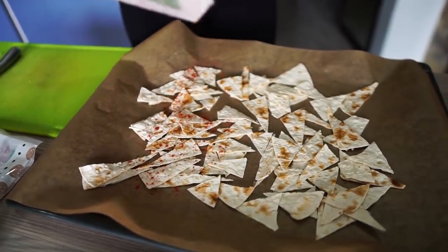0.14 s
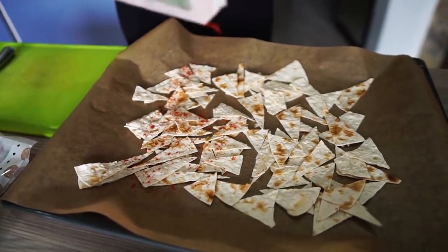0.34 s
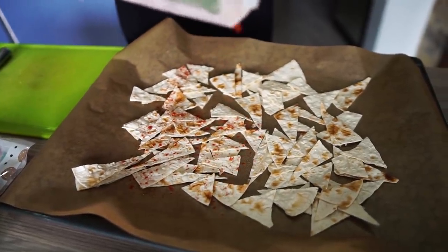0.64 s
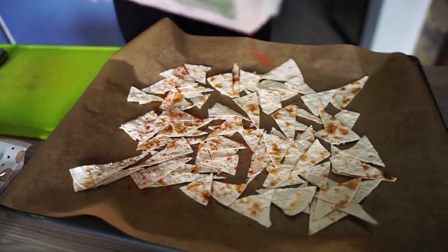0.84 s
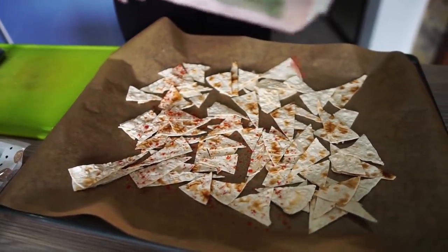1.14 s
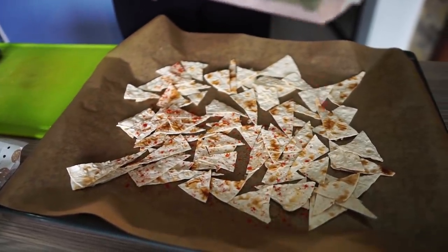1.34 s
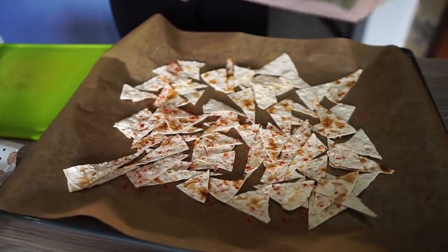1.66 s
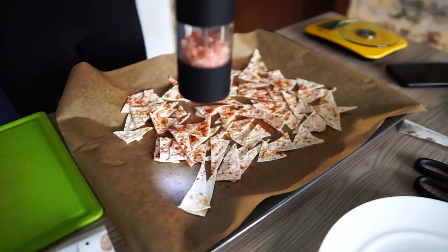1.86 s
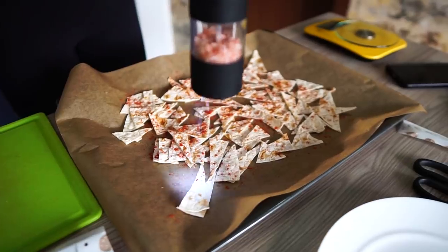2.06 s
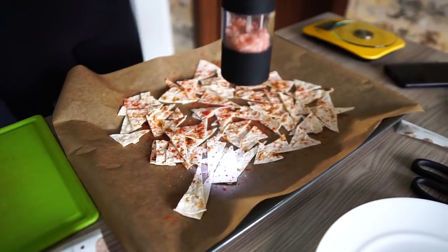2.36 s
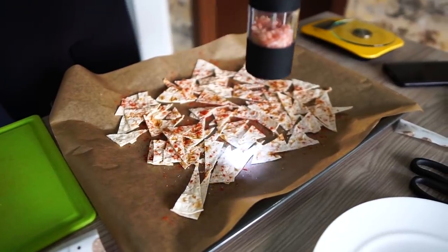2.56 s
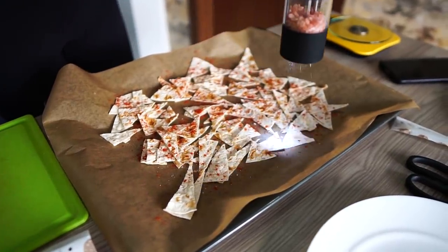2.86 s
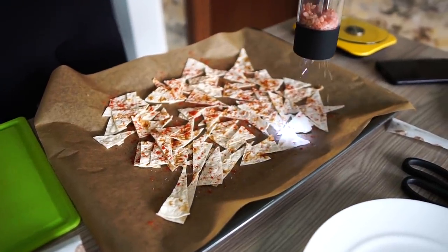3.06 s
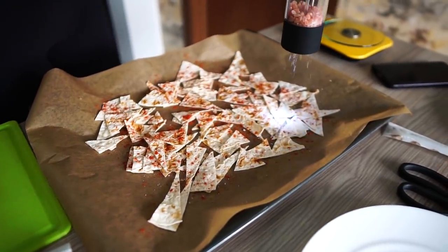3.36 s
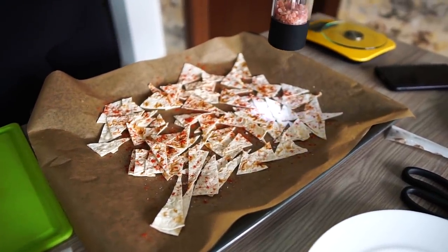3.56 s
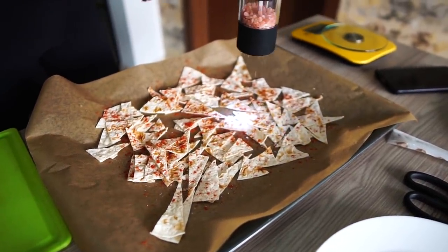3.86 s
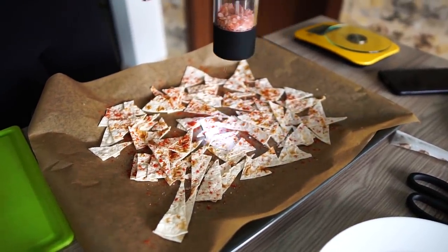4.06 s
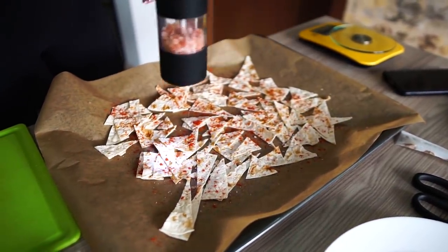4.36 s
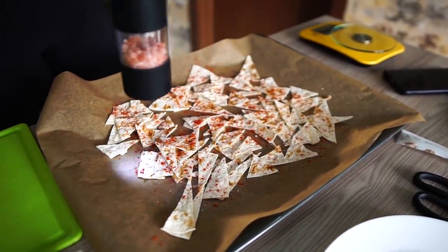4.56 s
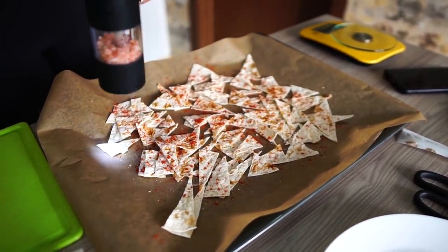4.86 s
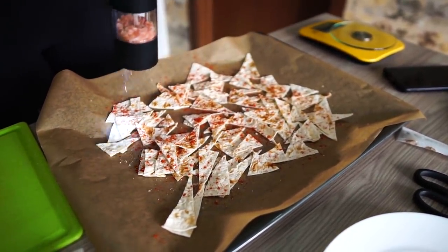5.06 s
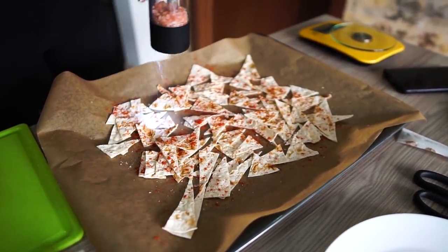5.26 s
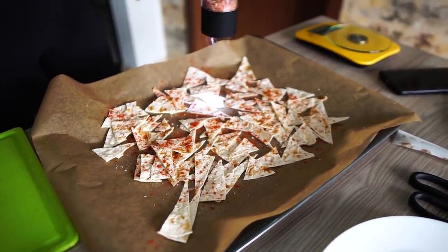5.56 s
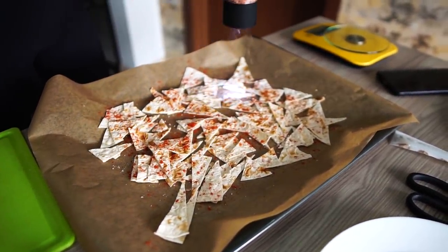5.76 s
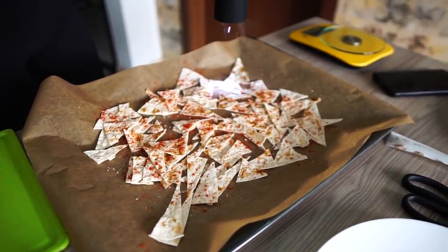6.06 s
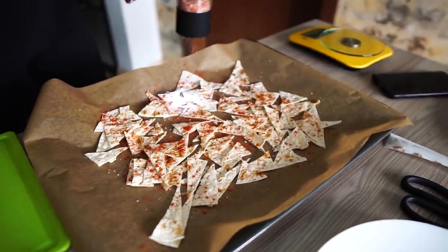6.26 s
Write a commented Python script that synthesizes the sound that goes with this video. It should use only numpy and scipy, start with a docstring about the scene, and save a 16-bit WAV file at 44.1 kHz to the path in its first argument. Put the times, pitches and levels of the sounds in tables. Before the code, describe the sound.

In a small home kitchen with a faint low appliance hum, a packet hisses and crinkles while fine spice ticks sharply onto baking paper. After about two seconds an electric salt mill starts abruptly, much louder: a high gear whine that sags and recovers, gritty burr crunching and irregular crystal cracks. It runs to the end, drifting slightly between left and right. Close stereo microphone, short room reflections.

```python
"""A kitchen hums while a packet rustles and spice ticks onto baking paper; then a small electric mill grinds salt.
Hum and air are wavering tones and soft filtered noise; the packet is hiss, crinkling puffs and short noise ticks.
The mill's gears are partials that whine and sag in pitch under load; its burr crunches as many tiny fractures.
Large crystals crack as body knocks with bursts of noise, and moving echoes follow the hand that sweeps the mill."""
import sys
import numpy as np
from scipy import signal
from scipy.fft import rfft, irfft, next_fast_len
from scipy.io import wavfile
from scipy.ndimage import uniform_filter1d, map_coordinates

SR = 44100
rng = np.random.default_rng(int(sys.argv[2]) if len(sys.argv) > 2 else 0)


def inscribe(sig):
    """Save sig as 16-bit PCM at rate SR to the path in sys.argv[1].

    A 1-D sig is mono; a 2-D sig holds one channel per row.
    Samples are clipped to [-1, 1] before scaling.
    """
    pcm = np.round(np.clip(np.atleast_2d(sig).T, -1, 1) * 32767)
    wavfile.write(sys.argv[1], SR, pcm.astype(np.int16))


N = 282612
START_S = 1.872  # the packet stops and the mill starts
SIDES = np.array([[1], [-1]])  # left, right


def amp(db):
    """Turns decibels into a plain multiplier."""
    return 10 ** (np.asarray(db) / 20)


def fade(t, t60_s):
    """A dying sound: it loses 60 dB in t60_s seconds."""
    return amp(-60 * t / t60_s)


def pan(db):
    """Left and right gains that are db apart; above zero leans left."""
    return amp(db / 2 * SIDES)


def evened(x):
    """Scales a sound to an rms level of one."""
    return x / np.sqrt(np.mean(x ** 2) + 1e-20)


def read(points, hz):
    """Reads a colour table at any pitch, with pitch on a log scale."""
    f, value = np.transpose(points)
    return np.interp(np.log(hz + 1), np.log(f + 1), value)


def follow(rows):
    """Every column of a curve table, one value a sample."""
    s, *columns = np.transpose(rows)
    return [np.interp(np.arange(N) / SR, s, c) for c in columns]


def coloured(x, gain):
    """Filters the last axis by a gain that depends on frequency."""
    size = next_fast_len(N)
    spectrum = rfft(x, size) * gain(np.fft.rfftfreq(size, 1 / SR))
    return irfft(spectrum, size)[..., :N]


def band(x, lo_hz, hi_hz):
    """Keeps mostly the sound between two pitches."""
    return signal.lfilter(*signal.butter(N=2, Wn=[lo_hz, hi_hz], btype="band", fs=SR), x)


def drift(hz):
    """Complex noise, smoothed so that it wanders up to about hz times a second."""
    step = int(SR / 1400) if hz < 45 else 1  # slow noise is drawn coarsely and joined by lines
    at = np.arange(0, N + step, step)
    r = np.exp(-2 * np.pi * hz * step / SR)
    a, b = signal.lfilter([1], [1, -2 * r, r * r], rng.standard_normal((2, len(at))))
    z = np.interp(np.arange(N), at, a + 1j * b)
    return z / np.sqrt(np.mean(abs(z) ** 2))


# the wavering appliance tones before the mill starts: (f/Hz, wander/Hz, rms level/dB, steadiness [no unit])
HUM_TONES = [(61, 2.9, -44, 1.8), (99.6, 2.8, -44.5, 4.1), (116.6, 3.4, -55, 0.5), (146.5, 8.5, -48, 0.54),
             (196.5, 0.38, -42.5, 7.9), (473, 3.3, -50.5, 2.8), (517.5, 14.4, -49, 2.2)]


def hum():
    """Appliance tones: each is a cosine whose loudness and phase wander slowly."""
    t, tones = np.arange(N) / SR, 0
    for hz, wander_hz, db, steadiness in HUM_TONES:
        loudness = evened(steadiness + drift(wander_hz).real)
        phase = 2 * np.pi * hz * t + 1.1 * drift(wander_hz).real
        tones = tones + amp(db) * np.sqrt(2) * loudness * np.cos(phase)
    return tones


# colour of the wash of air, before it is scaled as a whole: (f/Hz, relative level/dB)
AIR_COLOUR = [(12, -55), (20, -23), (49, -22), (103, 0.5), (167, -5.5), (200, 2), (276, -6.5), (332, -2.5),
              (414, -10.5), (517, -9), (714, -12.5), (2310, -32), (2500, -44), (3250, -63), (5500, -120)]
AIR_DB = -40  # level of the part both microphones share


def air():
    """A low wash of filtered noise, nearly alike at both microphones, most of all in the bass."""
    middle, other = coloured(rng.standard_normal((2, N)), lambda hz: amp(read(AIR_COLOUR, hz)))
    side = coloured(other, lambda hz: np.clip(hz / 1200, .03, .6))
    return amp(AIR_DB) * (middle + SIDES * side) / middle.std()


# how much of the kitchen's sound is left once the mill runs: (f/Hz, level/dB)
KITCHEN_DROP = [(25, -18), (45, -29), (62, -17.5), (100, -5.5), (150, -7.5), (200, -10.5), (500, -4.5)]


def kitchen():
    """Hum and air together; once the mill starts they are weaker, most of all in the deep bass."""
    room = hum() + air()
    weaker = coloured(room, lambda hz: amp(read(KITCHEN_DROP, hz)))
    return np.where(np.arange(N) / SR < START_S, room, weaker)


# colour of the hiss, before it is evened: (f/Hz, relative level/dB)
HISS_COLOUR = [(530, -20), (900, -3), (1340, -4.5), (1600, -1.5), (1810, -4.5), (3680, -5.5), (6800, -8),
               (13800, -8), (16000, -8)]


def hiss(level_db):
    """Fine grains on paper: filtered noise, partly shared by both sides."""
    noise = rng.standard_normal((3, N))
    wide = noise[0] + 1.8 * noise[1:]
    return evened(coloured(wide, lambda hz: amp(read(HISS_COLOUR, hz)))) * amp(level_db)


def crinkle(level_db, crinkle_hz):
    """The packet crinkles: short puffs at chance moments, shifted up to the pitch where the foil crinkles."""
    grains = amp(4.0 * np.minimum(rng.exponential(1, N), 3))
    grains = grains * (rng.random(N) < 300 / SR)  # about 300 a second
    puffs = signal.oaconvolve(grains, fade(np.arange(800) / SR, 0.023))[:N]
    wide = drift(1900) + 0.56 * drift(1100) * SIDES
    carrier = np.exp(2j * np.pi * np.cumsum(crinkle_hz) / SR)
    crinkle_db = -8.5  # against the hiss
    return amp(level_db + crinkle_db) * evened(puffs * (wide * carrier).real)


# the clearest ticks: (t/s, snap level/dB, snap centre f/Hz, left-right level/dB, relative paper thud level/dB)
CLEAR_TICKS = [(0.0461, -23, 10100, 1, -34.5), (0.0585, -27, 11400, .5, -46), (0.3355, -10, 7820, 6, -24),
               (0.424, -28, 8650, -1.5, -46), (0.4682, -24, 14100, -1.5, -37),
               (0.4808, -22, 10200, -.5, -44), (0.5477, -29, 7690, 3, -49), (0.572, -30, 7550, -1, -49),
               (0.5985, -30, 14000, -1, -50), (0.6305, -28, 13600, -.5, -40), (0.6414, -29, 10100, -2, -47),
               (0.6594, -28, 10000, -1, -53), (0.7562, -24.5, 7700, 1, -43), (0.7893, -26, 5090, 1, -48),
               (0.852, -30, 7300, 0, -39), (0.896, -30, 4080, 0, -39), (0.9275, -16, 4830, 1, -30),
               (0.9566, -25.5, 4230, .5, -46), (1.0794, -28, 5230, -.5, -40), (1.0966, -24, 2980, -1, -45),
               (1.111, -22, 5000, 0, -48), (1.1982, -35, 15400, -4, -50), (1.222, -25, 11800, 2, -45),
               (1.2397, -21, 10700, 1, -35.5), (1.367, -26, 15400, -1, -41), (1.3982, -29, 11900, -.5, -50),
               (1.4601, -32, 14200, -5, -50), (1.6616, -32, 10800, -10, -51), (1.694, -27, 13300, -8, -48),
               (1.8365, -28, 9700, -4, -50)]
FAINT_DB, FAINT_SPREAD_DB, FAINT_THUD_DB = -33, 2.5, -48
FAINT_LOW_HZ, FAINT_HIGH_HZ = 5000, 12000
SIZZLE_DB, SIZZLE_DB_PER_KHZ = -6.5, 1.2  # against the tick's level at 11 kHz; brighter ticks sizzle more


def faint_ticks(count):
    """Rows like those of the clear ticks, at chance moments and pitches."""
    return [(a * START_S, FAINT_DB + FAINT_SPREAD_DB * (2 * b - 1),
             FAINT_LOW_HZ * (FAINT_HIGH_HZ / FAINT_LOW_HZ) ** c,
             6.0 * (d - .5), FAINT_THUD_DB) for a, b, c, d in rng.random((count, 4))]


def spice_ticks():
    """Single ticks: each is noise cut into a sharp snap, a high sizzle and a thud of the paper."""
    out, t = np.zeros((2, N)), np.arange(1500) / SR
    for s, db, hz, pan_db, thud_db in CLEAR_TICKS + faint_ticks(count=22):
        shared, apart = rng.standard_normal((2, 1500))
        z = shared + 0.59 * apart * SIDES
        snap = band(z * (fade(t, 0.0037) + amp(-18) * fade(t, 0.044)), 0.81 * hz, min(1.4 * hz, 17000))
        snap = snap / (3 * snap[:, :130].std())  # brings the peak near one
        sizzle = band(1.75 * z * fade(t, 0.013), 9500, 22000)
        sizzle_db = db + SIZZLE_DB + SIZZLE_DB_PER_KHZ * (hz / 1000 - 11)
        # the sheet rings on longer
        thud = band(3.5 * z * (fade(t, .007) + amp(-15) * fade(t, .09)), 1700, 3500)
        tick = amp(db) * snap + amp(thud_db) * thud + amp(sizzle_db) * sizzle
        at = round(s * SR)
        out[:, at:at + 1500] += pan(pan_db) * tick
    return out


# how the packet rustles: (t/s, hiss level/dB, centre of the crinkle f/Hz)
PACKET_RUSTLE = [(0, -45.5, 8800), (.17, -44, 7200), (.3, -45, 6980), (.36, -43, 4500), (.41, -42, 5500),
                 (.46, -42, 12500), (.55, -43.5, 8400), (.61, -44.5, 12170), (.83, -44, 8630),
                 (.99, -41.5, 5930), (1.03, -46, 6480), (1.1, -40.5, 5300), (1.24, -43, 10500),
                 (1.31, -43, 6800), (1.37, -41.5, 12000), (1.43, -44, 10470), (1.47, -41.5, 13500),
                 (1.55, -48.5, 7540), (1.69, -44, 12500), (1.78, -43.5, 6500), (1.85, -44.5, 11700)]


def packet():
    """Hiss and crinkle follow one loudness curve until the mill starts; the ticks are added on top."""
    level_db, crinkle_hz = follow(PACKET_RUSTLE)
    rustle = hiss(level_db) + crinkle(level_db, crinkle_hz)
    return rustle * (np.arange(N) < START_S * SR) + spice_ticks()


# each time the teeth take load the gears sing out, levels before the body's colour:
# (start t/s, length t/s, whine level/dB, overtone level/dB)
GEAR_BITES = [(1.867, 0.073, -20.5, -26), (1.93, 0.1, -19, -13), (2.031, 0.059, -17, -16.5),
              (2.17, .17, -25, -18.5), (2.33, .06, -18, -12.5), (2.375, .07, -16, -14.5),
              (2.494, 0.036, -17.5, -14), (2.743, 0.042, -29, -21), (2.905, 0.11, -24, -20),
              (2.958, 0.11, -15, -23.5), (3.08, 0.086, -21, -26), (3.269, 0.058, -18.5, -20.5),
              (3.317, 0.057, -18.5, -23), (3.385, 0.094, -18.5, -20), (3.512, 0.072, -23, -24),
              (3.598, 0.057, -20.5, -18), (3.635, 0.056, -18.5, -15.5), (3.705, 0.062, -17.5, -16),
              (3.757, 0.056, -19, -19.5), (3.947, 0.077, -26.5, -21), (4.01, 0.039, -18, -16),
              (4.114, 0.09, -22, -18.5), (4.2, 0.079, -17, -20.5), (4.404, 0.17, -20, -27),
              (4.642, .05, -17.5, -18.5), (4.706, 0.12, -17, -17.5), (4.801, .1, -22.5, -21),
              (4.895, 0.045, -15.5, -22), (4.959, .07, -18, -32), (5.044, 0.07, -21, -15.5),
              (5.099, 0.042, -17, -31), (5.14, 0.066, -23, -32), (5.22, 0.27, -26.5, -30),
              (5.446, 0.11, -18.5, -22), (5.591, 0.062, -19.5, -12), (5.641, 0.17, -23, -21),
              (5.9, .04, -12.5, -14), (5.94, .08, -19, -24), (6.01, 0.1, -17, -18.5),
              (6.1, 0.097, -19, -18), (6.311, 0.076, -16, -21), (6.366, 0.058, -14.5, -16.5)]
BITE_RISE_S, BITE_FALL_S = 0.013, 0.012


def bites(column, idle_db):
    """A level that rises from idle, holds and falls back for every bite; powers add up."""
    t, power = np.arange(N) / SR, amp(2 * idle_db) * np.ones(N)
    for s, length, *db in GEAR_BITES:
        rising, falling = (t - s) / BITE_RISE_S, (s + length - t) / BITE_FALL_S
        shape = np.clip(np.minimum(rising, falling), 0, 1)
        power += amp(2 * db[column]) * shape ** 2
    return np.sqrt(power)


# the motor slows whenever salt jams the burr and spins up again; the burr also reads this:
# (t/s, tooth rate f/Hz)
MOTOR_SPEED = [(1.872, 1313), (1.94, 1603), (2.022, 1713), (2.064, 1511), (2.085, 1340), (2.178, 1903),
               (2.382, 1930), (2.415, 1863), (2.5, 1957), (2.52, 1862), (2.75, 1954), (2.93, 1953),
               (2.986, 1874), (3.052, 1735), (3.19, 1750), (3.282, 1955), (3.32, 1745), (3.375, 1200),
               (3.396, 1549), (3.502, 1880), (3.65, 1886), (3.668, 1768), (3.72, 1901), (3.76, 1756),
               (3.79, 1520), (3.815, 1200), (3.94, 1969), (4.034, 1891), (4.116, 1976), (4.16, 1940),
               (4.2, 1806), (4.28, 1621), (4.39, 1960), (4.45, 1782), (4.524, 1684), (4.64, 1940),
               (4.694, 1610), (4.74, 1555), (4.79, 1580), (4.9, 1884), (4.93, 1780), (5.055, 1700),
               (5.105, 1420), (5.18, 1450), (5.24, 1802), (5.446, 1915), (5.466, 1777), (5.51, 1765),
               (5.554, 1502), (5.65, 1731), (5.758, 1950), (5.89, 1949), (5.936, 1746), (5.994, 1768),
               (6.052, 1571), (6.086, 1620), (6.126, 1780), (6.3, 1935), (6.35, 1890), (6.386, 1740),
               (6.408, 1658)]
# the body favours some pitches, so each of the lowest four partials swells as it glides through them:
# (f/Hz, level/dB)
GEAR_BODY = [(1200, -10), (1500, -6.5), (1750, -0.5), (1950, -0.5), (2700, 2), (3000, -6.5), (3400, -10.5),
             (3800, -19), (4500, -5), (5000, -5.5), (5600, -10.5), (6300, -13.5), (7000, -11), (7700, -24)]
SPIN_UP_DB, SPIN_UP_HZ_PER_S = -10.5, 2200  # overtones fade while the motor regains speed


def gears():
    """Partials of a trembling tooth rate; higher ones smear more, and uneven teeth add a rough skirt."""
    hz, = follow(MOTOR_SPEED)
    turns = 2 * np.pi * np.cumsum(hz * (1 + .005 * drift(30).real)) / SR
    whine, overtones = bites(column=0, idle_db=-36.5), bites(column=1, idle_db=-40)
    gaining = uniform_filter1d(np.gradient(hz) * SR, size=600) / SPIN_UP_HZ_PER_S
    overtones = overtones * amp(SPIN_UP_DB * np.clip(gaining, 0, 1))
    levels = [amp(read(GEAR_BODY, k * hz)) * g
              for k, g in enumerate([whine, overtones, overtones, overtones], 1)]
    levels += [levels[3] * amp(db) for db in (-6.5, -6.5, -11.0, -18)]  # upper partials follow the fourth
    load = np.clip((1950 - hz) / 330, .2, 1)  # loaded teeth mesh evenly, free ones rattle
    steadiness = [.88] + [c * load for c in (.9, .88, .6, .4, .3, .3, .3)]
    grip = amp(2.2 * drift(28).real)  # teeth bite and let go
    out = 0
    for k, (level, steady) in enumerate(zip(levels, steadiness), 1):
        rough = np.sqrt(1 - steady ** 2) * drift(70 + 25 * k)
        partial = ((steady + rough) * np.exp(1j * k * turns)).real
        out = out + level * grip * np.sqrt(2) * partial
    return out


# broad colour of the plastic body: (f/Hz, relative level/dB)
HOUSING_COLOUR = [(150, -47), (250, -21), (510, -15.5), (816, -11), (1500, 2), (1910, 3), (2280, -3.5),
                  (2760, -2), (4340, -9.5), (4900, -7.5), (6360, -6.5), (7190, -12.5), (10000, -16.5),
                  (14200, -27.5), (16000, -19.5)]
# its resonances, before they are mixed onto that colour: (f/Hz, width/Hz, relative level/dB)
HOUSING_RESONANCES = [(1205, 230, -24.5), (2810, 600, -29), (3010, 93, -6), (4810, 450, 1),
                      (6000, 270, -13), (6600, 190, -15), (9100, 290, 6), (10200, 340, 5.5),
                      (13250, 300, 13), (13600, 370, 9)]


def housing(hz):
    """Gain of the plastic body: a broad colour with resonances on top."""
    modes = sum(amp(db) / np.sqrt(1 + (2 * (hz - f) / width) ** 2) for f, width, db in HOUSING_RESONANCES)
    return amp(read(HOUSING_COLOUR, hz)) * (1 + 0.45 * modes)


# the grinding, before overall level and dulling: (t/s, relative crunch level/dB, relative treble level/dB)
BURR_CRUNCH = [(1.872, -24.5, -3.5), (1.96, -21, -2), (2.06, -23, 0), (2.2, -21.5, -2), (2.41, -20.5, -3),
               (2.47, -21.5, -6), (2.52, -21, -4), (2.63, -21.5, -5), (2.76, -19, -8), (2.81, -23, -5),
               (2.855, -16.5, -7), (2.89, -24.5, -9), (2.93, -23, -4), (3.12, -21, -6), (3.19, -22.5, -3.5),
               (3.3, -23, -6), (3.43, -19.5, -6), (3.52, -23, -5.5), (3.65, -24, -3.5), (3.76, -21, -2),
               (4.04, -18, -5), (4.18, -19.5, -4.5), (4.32, -21.5, -6), (4.48, -20, 0), (4.6, -21.5, -2.5),
               (4.74, -21, -1), (4.92, -21, -1), (5.01, -18, -4.5), (5.14, -24, -2.5), (5.31, -19, -4),
               (5.34, -23, -4), (5.61, -19, -5), (5.88, -22.5, -6), (5.9, -21.5, -2.5), (6.17, -20, -5.5),
               (6.41, -22.5, -2.5)]
# a jammed crystal breaks and the burr runs empty until new salt drops in:
# (t/s, change in level/dB, time constant of the refill t/s)
BURR_EMPTIES = [(2.089, -5.5, 0.043), (2.54, -14, 0.014), (3.82, -8, 0.16), (4.05, -4, .08),
                (4.2, -5, 0.018), (4.93, -6.5, .04), (5.2, -6.5, 0.066)]
FREE_HZ, DULL_DB_PER_KHZ = 1960, 9.5  # the crunch dulls as the motor slows below the free tooth rate


def burr():
    """Thousands of small fractures a second ring through the body, with grain bursts that die in milliseconds."""
    t = np.arange(N) / SR
    level_db, bright_db = follow(BURR_CRUNCH)
    for s, db, refill_s in BURR_EMPTIES:
        level_db = level_db + db * (t > s) * np.exp(-abs(t - s) / refill_s)
    bright_db = bright_db - DULL_DB_PER_KHZ * (FREE_HZ - follow(MOTOR_SPEED)[0]) / 1000
    # about 5000 fractures and 70 bursts a second, a few much larger than the rest
    size = amp(2.64 * np.minimum(rng.exponential(1, N), 5)) * (rng.random(N) < 5000 / SR)
    bursts = amp(5.6 * np.minimum(rng.exponential(1, N), 3)) * (rng.random(N) < 70 / SR)
    bursts = signal.lfilter([1], [1, -fade(1 / SR, 0.011)], bursts)
    fractures = evened(size * rng.standard_normal(N))
    drive = (fractures + 0.81 * rng.standard_normal(N)) * (1 + 0.27 * bursts)
    sound = coloured(drive * amp(1.3 * drift(28).real), housing)
    # split off the treble, which has its own level
    high = coloured(sound, lambda hz: np.clip((hz - 6800) / 800, 0, 1))
    low = sound - high
    low_level = coloured(low, lambda hz: hz > 2200).std()
    return amp(level_db - 3.0) * (low / low_level + amp(bright_db) * evened(high))


# large crystals, levels before filtering:
# (t/s, relative crunch level/dB, relative thud level/dB, relative snap level/dB)
CRYSTAL_CRACKS = [(1.8953, -15, -35, -22), (1.957, -10.5, -24, -20), (2.0824, -10, -20.5, -21),
                  (2.4394, -18, -21.5, -28), (2.5294, -8.5, -24.5, -20), (2.6172, -13, -18, -22),
                  (2.6499, -8, -19, -28), (2.7687, -14, -28, -26), (3.062, -21, -42, -28),
                  (3.0782, -20, -19, -27), (3.1254, -12, -23, -29), (3.2954, -16, -23.5, -15),
                  (3.3694, -10, -38, -17), (3.6752, -22, -18.5, -25), (3.8104, -20, -20.5, -18),
                  (3.9968, -17, -16.5, -23), (4.04, -7, -33.5, -18), (4.1876, -6.5, -21.5, -16),
                  (4.2828, -9, -16.5, -21), (4.4314, -19, -19, -18), (4.4944, -5.5, -24, -22),
                  (4.5397, -9.5, -17, -11.5), (4.7816, -7, -20.5, -15.5), (4.9277, -12, -28, -23),
                  (4.979, -13, -20, -22), (5.0774, -6.5, -27, -27), (5.1078, -6.5, -24, -12),
                  (5.1522, -6, -25, -15.5), (5.1917, -10, -16.5, -19), (5.2879, -14, -21.5, -23),
                  (5.4137, -14, -26, -26), (5.5763, -10, -17.5, -21), (5.6997, -7.5, -20.5, -20),
                  (5.9934, -12, -26, -18), (6.1662, -10, -20.5, -22), (6.2408, -11, -25, -22)]
# tones of the knocked body, each shifted a little by chance: (f/Hz, relative level/dB, fade by 60 dB t/s)
BODY_KNOCK = [(350, -34, 0.036), (670, -17.5, 0.029), (863, -2.5, 0.026), (1448, 6, 0.021),
              (1860, -5, 0.0084), (2840, -22, .005)]


def cracks():
    """A crystal gives way: the body knocks, and a burst of splinters crackles for a few milliseconds."""
    t, out = np.arange(1500) / SR, np.zeros(N + 1500)
    chance = rng.standard_normal((len(CRYSTAL_CRACKS), 1500))
    for (s, crunch_db, thud_db, snap_db), z in zip(CRYSTAL_CRACKS, chance):
        knock = sum(amp(db) * fade(t, t60_s) * np.sin(2 * np.pi * hz * (1 + 0.15 * shift) * t)
                    for (hz, db, t60_s), shift in zip(BODY_KNOCK, z))
        burst = z * fade(np.maximum(t - .002, 0), 0.0011)  # full for 2 ms, then gone quickly
        splinters = amp(crunch_db) * band(burst, 800, 5130) + amp(snap_db) * band(burst, 3700, 14600)
        at = round(s * SR)
        out[at:at + 1500] += amp(thud_db) * knock + splinters
    # the cracks keep no deep bass
    return signal.lfilter(*signal.butter(N=2, Wn=260, btype="high", fs=SR), out[:N])


# tray, counter and wall under the moving hand: (delay t/ms, sway t/ms, level/dB)
CLOSE_ECHOES = [(.9, .12, -15), (1.7, 0.22, -2.5), (3.1, 0.283, -10), (5.3, 0.58, -11.5)]
# the close surfaces throw back mostly treble: (f/Hz, level/dB)
ECHO_COLOUR = [(500, -17), (2000, -12.5), (3500, -1.5), (12000, 2)]
# colour of the room tail: (f/Hz, level/dB)
ROOM_COLOUR = [(300, -14), (1500, -9.5), (2500, -6), (4000, -7.5), (12000, -5)]
ROOM_T60_S = .11


def spread(x):
    """Two microphones: close reflections whose paths change as the hand moves, then the room tail."""
    n, t = np.arange(N), np.arange(SR // 4) / SR
    near = coloured(x, lambda hz: amp(read(ECHO_COLOUR, hz)))
    far = coloured(x, lambda hz: amp(read(ROOM_COLOUR, hz)))
    out = np.array([x, x])
    for ms, sway_ms, db in CLOSE_ECHOES:
        path, apart = drift(0.423).real, drift(0.68).real
        for side in (0, 1):
            lag = (ms + sway_ms * (path + 0.25 * apart * (2 * side - 1))) * SR / 1000
            out[side] += amp(db) * map_coordinates(near, [n - lag], order=3, prefilter=False)
    for k in range(3):  # the room answers differently from each place: three tails take turns
        share = np.sqrt(2 / 3) * np.cos(2 * np.pi * (0.7185 * n / SR + k / 3))
        tail = rng.standard_normal((2, len(t))) * fade(t, ROOM_T60_S) * (t > .006)
        tail = tail / np.linalg.norm(tail[0])
        out += signal.oaconvolve((share * far)[None], tail, axes=1)[:, :N]
    return out


# the mill moves across: (t/s, left-right level/dB)
HAND_SWEEP = [(1.9, -0.5), (2.8, -2), (2.95, -3.5), (3.77, -3), (3.83, -2.0), (4.92, 1.5), (6.07, -1.5),
              (6.4, 0.0)]


def mill():
    """Gears, burr and cracks start together, echo nearby and move between left and right with the hand."""
    rise = np.clip((np.arange(N) / SR - START_S) / .002, 0, 1)
    return spread(rise * (gears() + burr() + cracks())) * pan(follow(HAND_SWEEP)[0])


def scene():
    """The humming kitchen, the packet and then the mill."""
    return kitchen() + packet() + mill()


def record(dry):
    """Gently rounds off loud peaks, then removes the highest treble."""
    soft = .85 * np.tanh(dry / .85)
    edge_hz = 15780
    lowpass = signal.firwin(511, edge_hz, window=("kaiser", 9), fs=SR)
    return signal.oaconvolve(soft, lowpass[None], "same")


dry = scene()
out = record(dry)
inscribe(out)
```